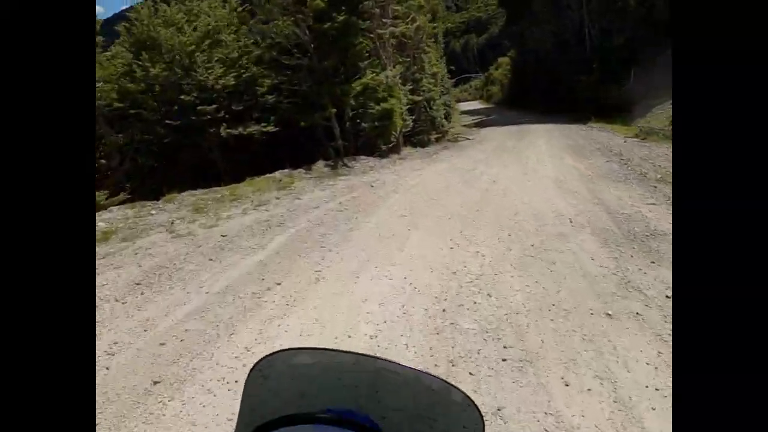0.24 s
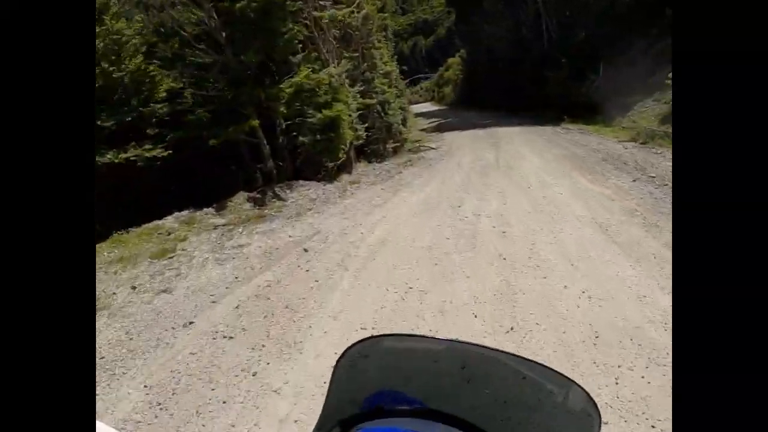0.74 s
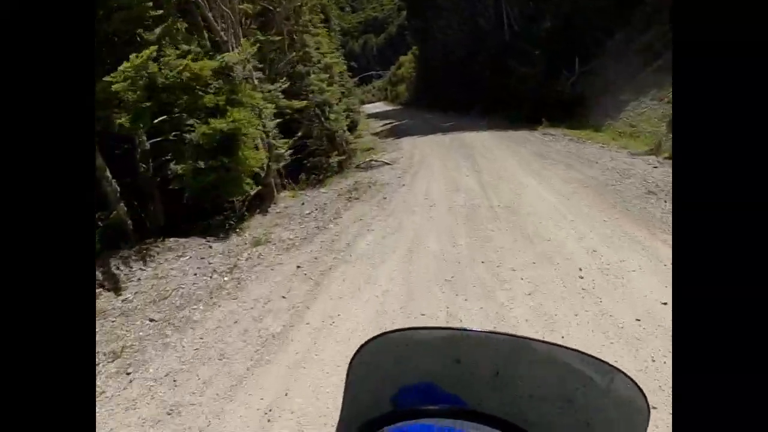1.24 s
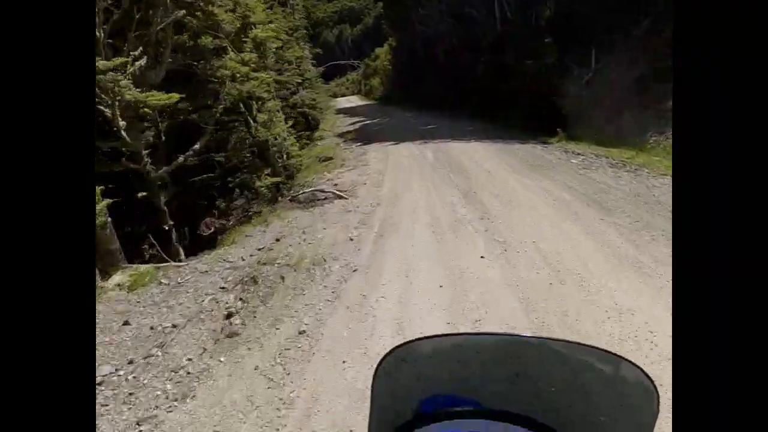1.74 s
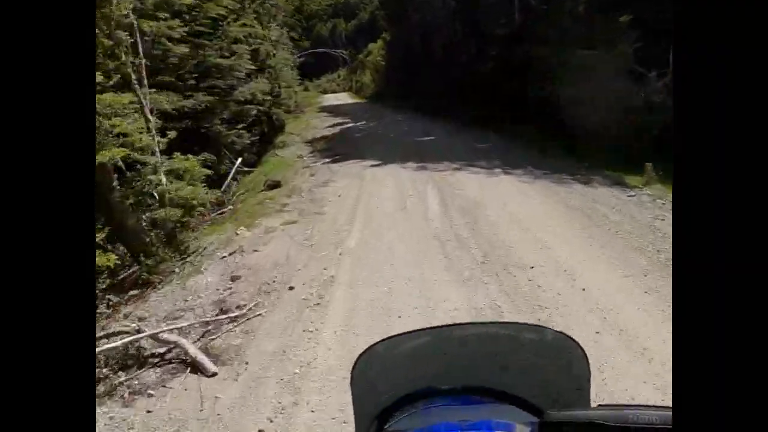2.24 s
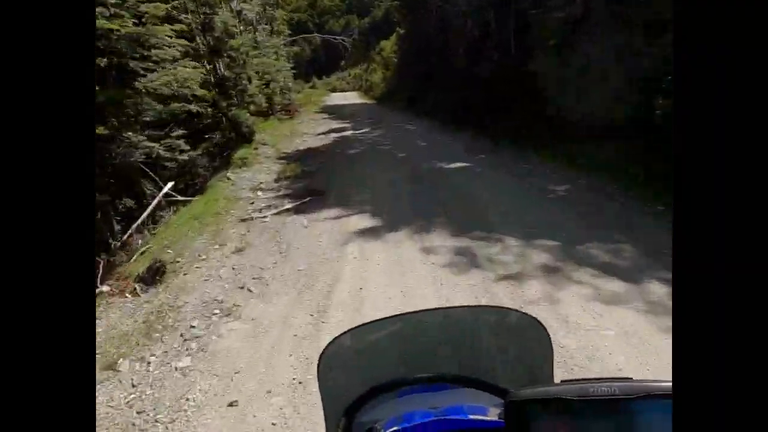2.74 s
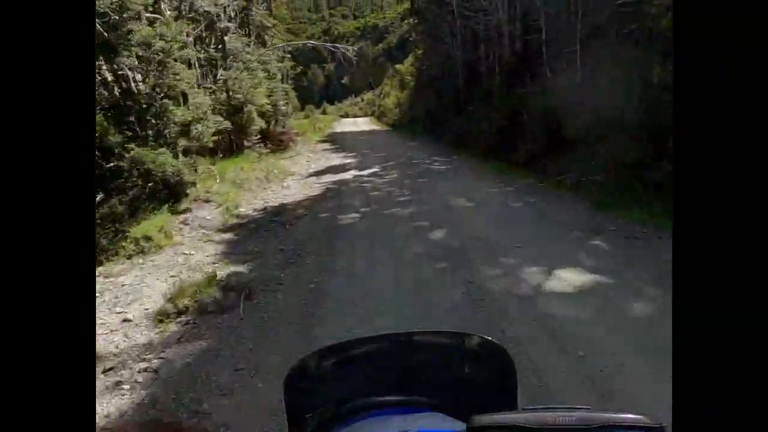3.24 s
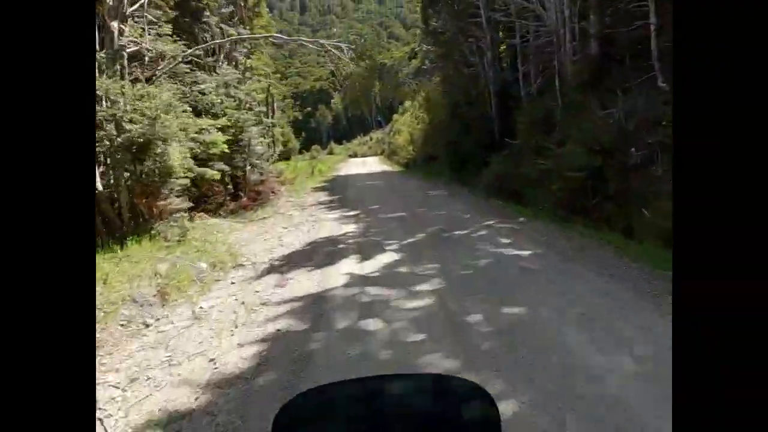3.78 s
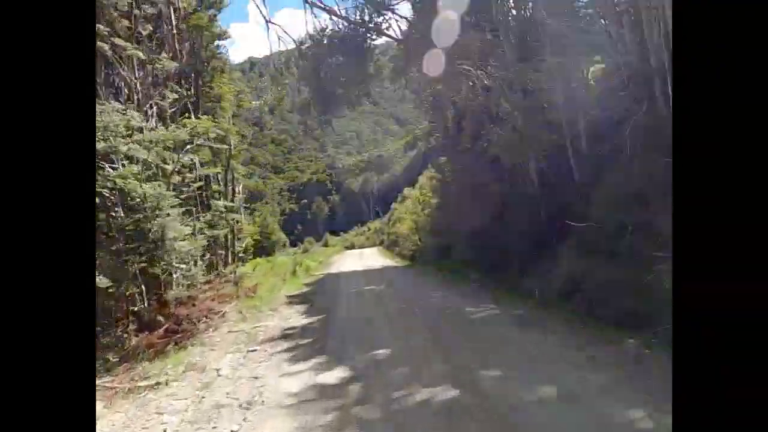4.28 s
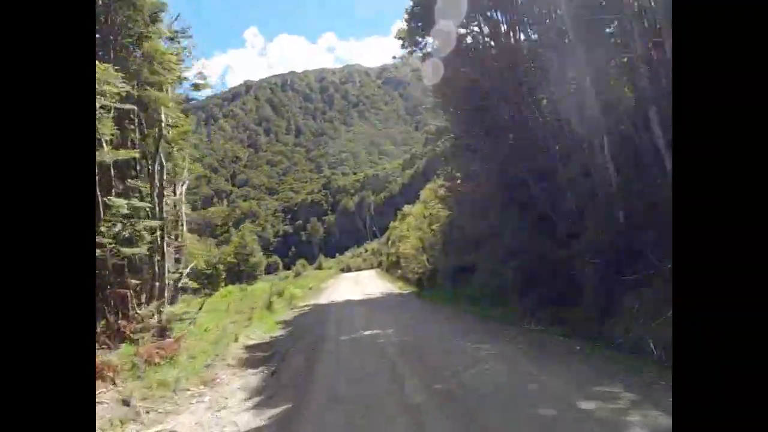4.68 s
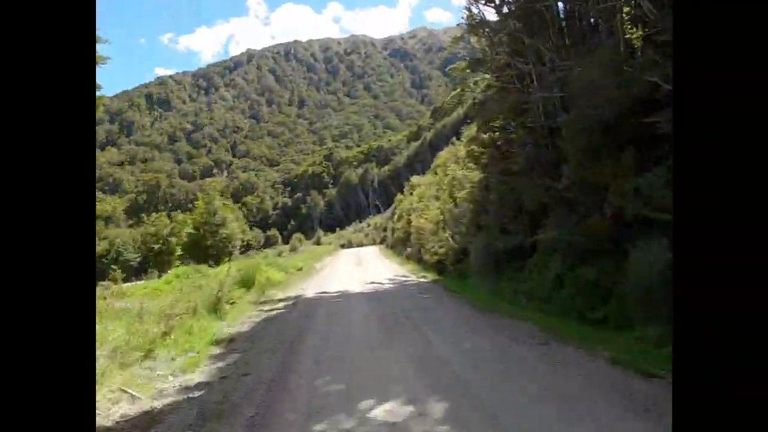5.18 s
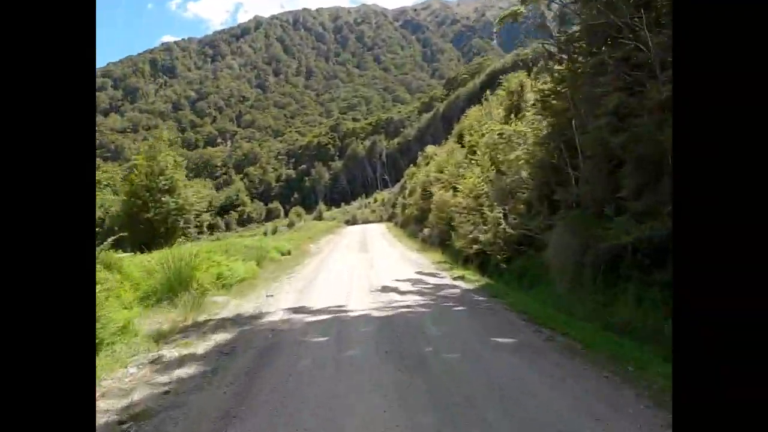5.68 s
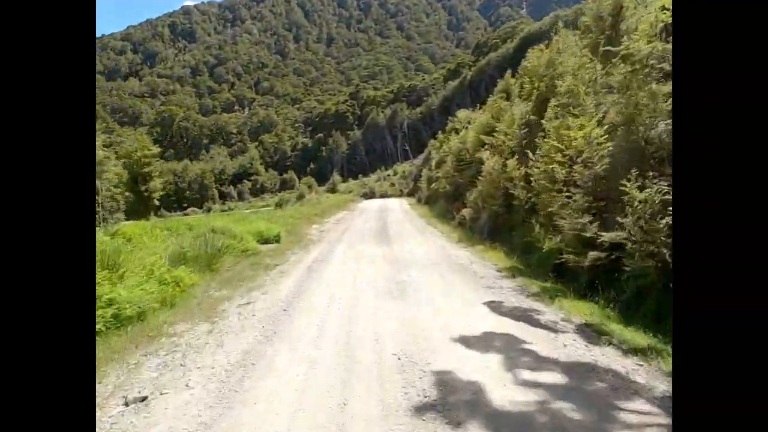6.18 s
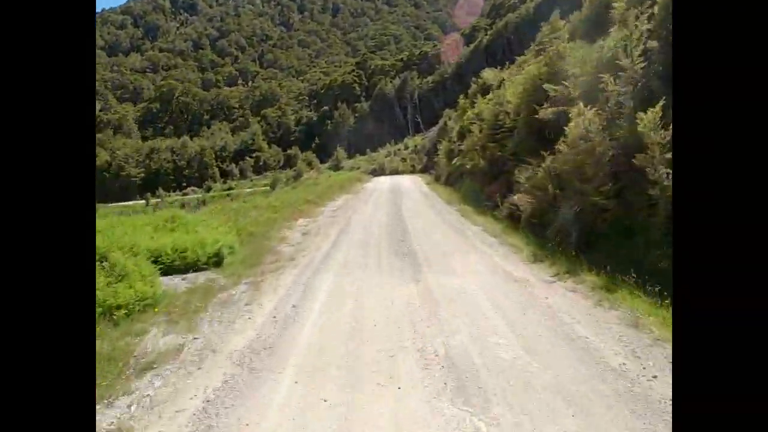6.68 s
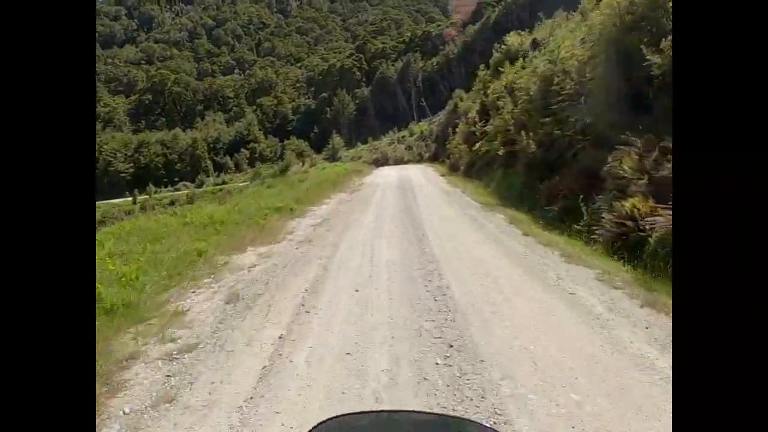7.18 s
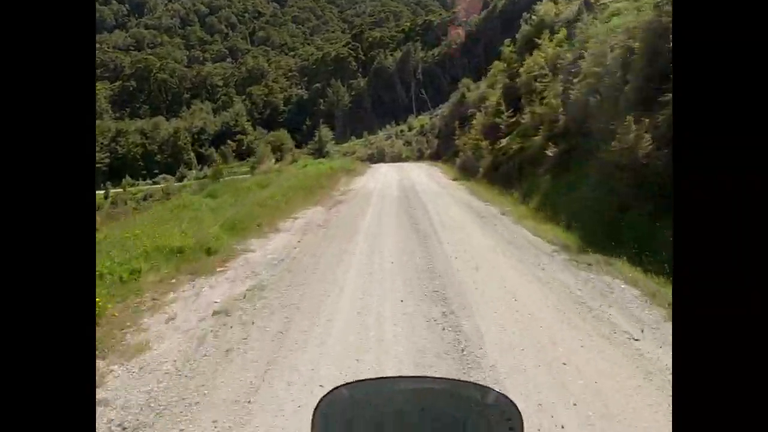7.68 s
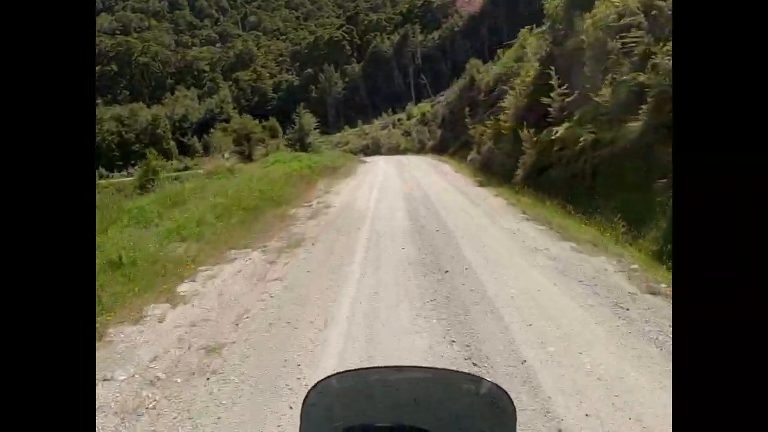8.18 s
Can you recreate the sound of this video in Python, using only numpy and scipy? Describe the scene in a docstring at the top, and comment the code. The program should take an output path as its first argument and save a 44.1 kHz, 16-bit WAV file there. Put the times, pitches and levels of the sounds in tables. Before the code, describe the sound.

A single-cylinder motorcycle revs up, shifts and cruises along a gravel forest road, with buffeting wind, tyre roar and irregular hard knocks close to the microphone.

```python
"""A single-cylinder motorcycle engine, heard from the rider's helmet on a gravel road: each stroke gates a burst
of noise through the resonances of the bodywork, with clatter and a steadier rasp. Tyres roar and drone over a
quiet low-mid rumble, wind buffets the two microphone ports and hums, a gear whine wanders, and bumps knock, thud
and snap the mount as damped oscillations. The recorder rolls off the treble, limits and clips the peaks, and
adds faint hiss."""
import sys
import numpy as np
from scipy import signal
from scipy.fft import rfft, irfft, next_fast_len
from scipy.io import wavfile
from scipy.ndimage import uniform_filter1d

SR = 44100
rng = np.random.default_rng(int(sys.argv[2]) if len(sys.argv) > 2 else 0)


def bounce(signal):
    """Save signal as a 16-bit WAV file at the path given by the first command-line argument."""
    frames = np.transpose(np.atleast_2d(signal))
    limited = np.clip(frames, -1, 1)
    pcm = np.round(limited * 32767).astype(np.int16)
    wavfile.write(sys.argv[1], SR, pcm)


N = 371322
BLOW_TIME = np.arange(4000) / SR   # time axis of one blow on the mount, s


def from_db(db):
    """Amplitude ratio of a level: twenty decibels are a factor of ten."""
    return 10 ** (np.asarray(db) / 20)


def rms_one(x):
    """Scale to unit root mean square, the effective amplitude."""
    return x / np.sqrt(np.mean(x ** 2) + 1e-20)


def in_time(rows):
    """Piecewise linear courses of a table's columns, evaluated at every sample."""
    s, *columns = np.transpose(rows)
    return [np.interp(np.arange(N) / SR, s, column) for column in columns]


def at_hz(points, hz):
    """Interpolate along logarithmic frequency, the scale of pitch."""
    points = np.array(points)
    return np.interp(np.log(hz + 1), np.log(points[:, 0] + 1), points[:, 1])


def noise():
    """Three independent white noises, of equal expected power at all frequencies."""
    return rng.standard_normal((3, N))


def drift(rate_hz):
    """Slow random fluctuation of unit spread: white noise through two equal one-pole low-passes."""
    step = 40   # samples between the computed points
    pole = np.exp(-2 * np.pi * rate_hz * step / SR)
    white = rng.standard_normal(N // step + 2002)
    slow = signal.lfilter([1], [1, -2 * pole, pole * pole], white)[2000:]   # settled part only
    return np.interp(np.arange(N) / step, np.arange(len(slow)), rms_one(slow))


def spectrum(points):
    """Continuous colouring: a frequency response drawn through levels."""
    return lambda hz: from_db(at_hz(points, hz))


def modes(table):
    """Modal resonance: the powers of Lorentzian peaks add, each squared for steep skirts."""
    def response(hz):
        power = 0
        for centre_hz, width_hz, db in table:
            detuning = 2 * (hz - centre_hz) / width_hz
            power = power + from_db(2 * db) / (1 + detuning ** 2) ** 2
        return np.sqrt(power)
    return response


def at_ports(drive, colour, least_share=0):
    """Partial coherence: one drive reaches both ports with a phase difference, two others reach one port each."""
    # phase by which the left port leads (f/Hz, phase/rad)
    port_phase = [(80, -.1), (260, -1.1), (430, -.2), (780, .6), (1100, -1), (1600, -.5), (2150, -1.7),
                  (2700, -2.9), (3200, -1), (4220, -.9), (4500, -.9), (4750, 1.3), (5400, 2.3), (6100, -.5),
                  (7000, -2.5)]
    # left port's level above the right (f/Hz, level/dB)
    port_balance = [(40, 4), (90, -6.5), (170, -6.5), (300, -1), (700, -4.5), (1000, 1), (1460, 4.5),
                    (1700, -4), (2000, 2), (2500, -6.5), (3050, 0.5), (3360, 1.5), (3700, 11.5),
                    (4050, -1.5), (4400, -8.5), (4600, 2.5), (5100, -14), (6100, -11.5), (6600, -7),
                    (7500, 1)]
    # share of the power heard by both ports (f/Hz, share 0-1)
    shared = [(30, 0.82), (90, 0.41), (200, 0.86), (430, 0.46), (600, 0.79), (900, 0.15), (1100, 0.95),
              (1300, 0.97), (1800, 0.44), (2800, 0.11), (3500, 0.21), (4200, 0.88), (4550, 0.16), (5000, 1),
              (5600, 0.17), (7000, 0.52)]
    size = next_fast_len(N)
    hz = np.fft.rfftfreq(size, 1 / SR)
    both, left_only, right_only = rfft(drive, size) * colour(hz)
    share = np.clip(at_hz(shared, hz), least_share, 1)
    common, private = np.sqrt(share), np.sqrt(1 - share)
    turn = np.exp(.5j * at_hz(port_phase, hz))   # half the phase difference to each port
    tilt = from_db(at_hz(port_balance, hz) / 2)
    left = tilt * (common * both * turn + private * left_only)
    right = (common * both / turn + private * right_only) / tilt
    out = irfft([left, right], size)[:, :N]
    return out / np.sqrt(np.mean(out.mean(axis=0) ** 2))   # unit RMS of the ports' mean


def wavering_tone(hz, width_hz, swell, count):
    """Narrow-band oscillation: a carrier times a complex drift; swell 1 is narrow noise, 0 nearly keeps its height."""
    carrier = np.exp(2j * np.pi * np.cumsum(hz) / SR)
    wander = np.array([drift(width_hz) + 1j * drift(width_hz) for k in range(count)])
    levelling = (np.abs(wander) + 0.074) ** (1 - swell)
    return (carrier * wander / levelling).real


def road():
    """Broadband tyre roar on gravel, a drone in hollow resonances, and a quiet low-mid rumble of filtered noise."""
    # road levels (t/s, roar level/dB, drone level/dB)
    road_levels = [(0, -36, -41.5), (.6, -40.5, -36), (1.2, -39, -34), (1.75, -32.5, -32.5),
                   (2.45, -32.5, -36), (2.75, -27, -40), (3.12, -26, -35), (3.75, -29, -28.5),
                   (4.17, -29, -25), (4.55, -29.5, -25), (5.0, -29, -24.5), (5.35, -28.5, -23),
                   (5.7, -28, -23), (5.95, -30, -22.5), (6.54, -31, -30), (7.2, -31, -28.5),
                   (7.65, -30.5, -29.5), (8.21, -27.5, -33.5), (8.42, -26.5, -23)]
    # roar colour (f/Hz, level/dB per Hz)
    roar_colour = [(200, -43.5), (280, -6), (355, 1.5), (430, -7), (660, -7), (800, -7.5), (910, -1.5),
                   (1000, -2.5), (1400, -7), (1700, -23), (2300, -26), (3200, -44)]
    # hollow resonances (f/Hz, width/Hz, level/dB)
    drone_modes = [(161.4, 29.6, -0.5), (353.3, 22, -13), (542, 37, -17.5), (688.5, 84, -14.5)]
    # quiet low-mid rumble (t/s, level/dB)
    rumble_level = [(0, -47), (.5, -45.5), (1.1, -45.5), (1.9, -46), (2.6, -52.5), (8.42, -48)]
    # rumble colour, strongest about 250-340 Hz (f/Hz, level/dB per Hz)
    rumble_colour = [(180, -24), (250, 2), (340, 0.5), (450, -8), (560, -26.5)]
    roar_db, drone_db = in_time(road_levels)
    rumble_db, = in_time(rumble_level)
    roar = at_ports(from_db(2.0 * drift(38)) * noise(), spectrum(roar_colour))
    drone = at_ports(from_db(0.8 * drift(6.2)) * noise(), modes(drone_modes))
    rumble = at_ports(from_db(2.7 * drift(25)) * noise(), spectrum(rumble_colour))
    return from_db(rumble_db) * rumble + from_db(roar_db) * roar + from_db(drone_db) * drone


def hum():
    """Aeolian tones: two slightly wavering hums, strongest while the head is turned into the wind."""
    # hum in the airstream (t/s, low f/Hz, low level/dB, high f/Hz, high level/dB)
    hum_course = [(0, 59.7, -52.5, 166.3, -53), (4.05, 60.34, -45, 168.8, -41), (4.3, 63.8, -20, 170, -34),
                  (4.5, 64.94, -18.5, 176.6, -25), (4.7, 65.96, -14, 167.3, -24.5),
                  (4.82, 60.4, -19, 167, -28.5), (4.95, 64.7, -17, 174.6, -16.5),
                  (5.15, 64.5, -17.5, 164.9, -21.5), (5.3, 62.1, -38, 157, -22),
                  (5.48, 68.6, -11, 158.5, -29.5), (5.7, 66.9, -21, 163.7, -23),
                  (5.95, 59.8, -21.5, 170, -49), (6.2, 60.1, -27, 162.6, -37.5),
                  (8.42, 59.1, -48.5, 162, -46.5)]
    low_hz, low_db, high_hz, high_db = in_time(hum_course)
    low, = wavering_tone(low_hz, width_hz=7.0, swell=0.25, count=1)
    high, = wavering_tone(high_hz, width_hz=7.0, swell=0.5, count=1)
    low_pair = rms_one(low) * from_db([[-1.5], [1.5]])   # left, right
    high_pair = rms_one(high) * from_db([[-4], [3]])
    return from_db(low_db) * low_pair + from_db(high_db) * high_pair


def air():
    """Vortex shedding and turbulence: eddies at a rate set by the head's angle, lumpy rush above; both gust."""
    # airstream, levels before the gusts (t/s, eddy f/Hz, buffeting level/dB, rush level/dB)
    air_course = [(0, 44.2, -20, -32.5), (.5, 44.3, -15.5, -30.5), (1.15, 46.05, -21.5, -33.5),
                  (1.9, 44.65, -15.5, -29), (2.15, 43.93, -20, -33.5), (2.4, 43.04, -12.5, -26),
                  (2.75, 41.7, -15.5, -26), (3.05, 41.75, -11.5, -22.5), (3.75, 42, -12.5, -28.5),
                  (3.98, 41.5, -8, -30), (4.12, 43.95, -23, -26), (4.3, 42.65, -17.5, -23),
                  (4.8, 44.84, -20.5, -20.5), (5.25, 46.1, -15.5, -23), (5.65, 41.15, -18, -23),
                  (6.0, 46.27, -18, -21.5), (6.6, 47.95, -17.5, -29.5), (7.15, 39.5, -20.5, -29.5),
                  (7.42, 35.22, -15.5, -25), (7.95, 33.67, -16.5, -23), (8.3, 35.94, -14.5, -24),
                  (8.42, 35.9, -16, -25.5)]
    # rush colour (f/Hz, level/dB per Hz)
    rush_colour = [(60, -16.5), (90, 12), (125, -1), (160, 0.5), (200, 1), (260, -0.5), (320, -49)]
    eddy_hz, buffet_db, rush_db = in_time(air_course)
    eddies = wavering_tone(eddy_hz, width_hz=17.5, swell=0.39, count=3)
    buffet = at_ports(eddies, spectrum([(12, -25.0), (28, -2.0), (200, -11.0)]))   # (f/Hz, level/dB)
    rush = at_ports(from_db(1.7 * drift(30)) * noise(), spectrum(rush_colour))
    buffet_gusts_db, rush_gusts_db = 2.4 * drift(9.5), 2.4 * drift(7.0)
    return from_db(buffet_db + buffet_gusts_db) * buffet + from_db(rush_db + rush_gusts_db) * rush


def whine():
    """Gear whine: an unsteady narrow-band transmission tone, much stronger at the left port, though it reaches
    the right port 6 samples earlier."""
    # whine, level before the port gains (t/s, f/Hz, level/dB)
    whine_course = [(0, 860, -47.5), (2.3, 870, -46), (2.6, 867, -33), (3.0, 905, -52), (3.3, 922, -37),
                    (3.5, 918, -34.5), (3.7, 930, -41), (3.82, 955, -31.5), (4.05, 991, -30),
                    (4.15, 1003, -44), (4.3, 977, -48.5), (5.8, 905, -51.5), (6.35, 911, -34.5),
                    (6.55, 918, -34), (6.65, 925, -43), (6.8, 932, -36), (7.05, 923.6, -37),
                    (7.3, 907, -32), (7.5, 916, -40), (7.65, 882, -31), (7.78, 846, -30.5),
                    (7.95, 853, -32), (8.03, 872, -26), (8.2, 883, -31.5), (8.42, 885, -30.5)]
    hz, db = in_time(whine_course)
    tone = rms_one(wavering_tone(hz, width_hz=6.0, swell=0.2, count=1)[0])
    return from_db(db) * np.array([1.11 * tone, 0.15 * np.roll(tone, -6)])   # right shifted by 6 samples


def swing(hz):
    """Damped oscillation: a sine swing and rebound, spent after about one cycle."""
    return np.sin(2 * np.pi * hz * BLOW_TIME) * np.exp(-(BLOW_TIME * hz) ** 3)


def add(out, s, shape, pan_db):
    """Interaural-style level and time difference: pan_db is left over right, and the left port hears it later."""
    for side, lag_s, sign in ((0, .0011, 1), (1, 0, -1)):
        at = int((s + lag_s) * SR)
        out[side, at:at + len(shape)] += from_db(sign * pan_db / 2) * shape


def knocks(out):
    """Impulse response of the mount: a wobble, a quick swing and rebound, after-ring and rattling fittings."""
    # knocks, level midway between the ports (peak t/s, peak level/dB, left-right level/dB)
    knock_rows = [(0.1322, -4.5, -9), (0.353, -3.5, -12), (0.6027, -3.5, -9), (0.7905, -4.5, -10),
                  (0.966, -4.5, -10), (1.3804, -3.5, -9), (1.5055, -3.5, -9), (1.7238, -4.5, -10),
                  (1.84, -4.5, -10), (3.2148, -5.5, -10), (3.6488, -9.5, -4), (3.769, -7.5, -9),
                  (3.8121, -11.5, -9), (3.9179, -6.5, -6), (4.0214, -4.5, -11), (4.3952, -7.5, -10),
                  (4.5115, -8.5, -9), (5.2778, -7.5, -11), (5.4911, -6.5, -9), (5.6175, -9.5, -9),
                  (5.738, -3.5, -11), (5.9828, -6.5, -7), (6.1101, -1.5, -8), (6.2262, -3.5, -11),
                  (6.3399, -6.5, -12), (6.4605, -6.5, -11), (6.6085, -6.5, -8), (6.8388, -3.5, -7),
                  (7.0221, -10.5, -8), (8.2576, -9.5, -5)]
    t, knock_hz = BLOW_TIME, 155
    windup_lead_s, windup_hz, windup_db = .0051, 290, -9   # dB under the knock
    rattle_db, rattle_decay_s, rattle_band_hz = -22.5, 0.015, (225, 514)
    after_ring_db, after_ring_decay_s = -27.5, 0.023
    one_cycle = t < 1 / windup_hz
    windup = np.sin(2 * np.pi * windup_hz * t) * (t * windup_hz / .75) * one_cycle   # grows as it goes
    after_ring = from_db(after_ring_db) * np.sin(2 * np.pi * knock_hz * t) * np.exp(-t / after_ring_decay_s)
    edge = .3 * swing(2.2 * knock_hz)   # the contact sharpens the front
    blow = swing(knock_hz) + edge + after_ring
    band = signal.butter(2, rattle_band_hz, "band", fs=SR, output="sos")
    grains = signal.sosfilt(band, rng.standard_normal((len(knock_rows), len(t))))
    rattles = rms_one(grains) * np.exp(-t / rattle_decay_s)
    for (s, db, pan_db), rattle in zip(knock_rows, rattles):
        add(out, s, from_db(db + rattle_db) * rattle, pan_db)
        add(out, s - windup_lead_s, from_db(db + windup_db) * windup, pan_db)
        add(out, s - .2 / knock_hz, from_db(db) * blow, pan_db)   # begins a fifth of a cycle before its peak


def thuds(out):
    """Low-frequency transient: the mount is pulled inward, then lurches slowly under a Gaussian envelope."""
    # heavy thuds, level midway between the ports (peak t/s, peak level/dB)
    thud_rows = [(0.337, -5.7), (0.442, -6.5), (0.748, -7.0), (0.922, -7.7), (1.669, -6.9), (1.773, -7.2),
                 (1.933, -6.2), (2.72, -6.4), (5.701, -4.9), (6.307, -8.1), (6.409, -7.8), (6.527, -7.9),
                 (6.676, -6.3), (6.769, -6.2), (7.404, -7.4), (7.652, -9.0), (8.155, -5.9), (8.323, -7.9)]
    lurch_hz, lurch_width_s, lurch_pan_db = 50, .0125, -3
    pull_lead_s, pull_hz, pull_db, pull_pan_db = .0104, 105, -6.5, -11   # dB under the thud
    middle = BLOW_TIME[-1] / 2
    from_peak = BLOW_TIME - middle
    lurch = np.cos(2 * np.pi * lurch_hz * from_peak) * np.exp(-(from_peak / lurch_width_s) ** 2 / 2)
    for s, db in thud_rows:
        add(out, s - middle, from_db(db) * lurch, lurch_pan_db)
        add(out, s - pull_lead_s, -from_db(db + pull_db) * swing(pull_hz), pull_pan_db)


def snaps(out):
    """Sharp contact: a damped swing of the mount with a crack, the impulse response of a band-pass."""
    # snaps, levels midway between the ports (start t/s, swing level/dB, left-right level/dB,
    # swing f/Hz, crack peak level/dB, top of the crack f/Hz, first swing 1 outward or -1 inward)
    snap_rows = [(.1275, -20, -9, 340, -23, 800, 1), (.3487, -11, -9, 360, -22, 900, 1),
                 (.4304, -4, -12, 270, -19, 600, -1), (.7855, -14, -10, 340, -21, 800, 1),
                 (6.8604, -1, -7, 170, -12, 2250, -1), (6.8572, -24, -7, 400, -13, 1200, -1),
                 (6.8660, -8, -8, 370, -18, 900, -1), (6.8680, -8, -5, 85, -30, 700, 1),
                 (.3255, -22, -9, 300, -22, 700, -1), (.7375, -24, -9, 300, -27, 600, -1)]
    click = np.zeros(len(BLOW_TIME))
    click[30] = 1.0   # sample 30: just after contact
    for s, db, pan_db, hz, crack_db, top_hz, first in snap_rows:
        band = signal.butter(5, [330, top_hz], "band", fs=SR, output="sos")
        crack = signal.sosfilt(band, click)
        shape = from_db(crack_db) * crack / crack.max() + first * from_db(db) * swing(hz)
        add(out, s, shape, pan_db)


def mount_blows():
    """Superposition of all the blows on the mount, with room for the last to die away."""
    out = np.zeros((2, N + SR))
    knocks(out)
    thuds(out)
    snaps(out)
    return out[:, :N]


def throb(depth, second_db, length, rise, uneven_db, lead=0, head=0):
    """Amplitude modulation by the strokes: each burst swells and dies; no two cycles are equally strong."""
    # four-stroke cycle rate: it pulls, shifts up near 2.2 s, then cruises (t/s, f/cycles per s)
    speed = [(0, 17.27), (.75, 23.0), (1.1, 25.43), (1.3, 27.27), (1.45, 27.92), (1.6, 28.1), (1.75, 30.2),
             (1.9, 31.2), (2.1, 30.48), (2.35, 27.77), (2.6, 25.35), (3.0, 25.95), (3.5, 27.63),
             (3.9, 28.88), (4.15, 28.74), (4.3, 28.03), (4.5, 28.52), (4.75, 29.0), (4.95, 29.17),
             (5.2, 28.92), (5.5, 28.47), (5.85, 28.38), (6.15, 28.68), (6.35, 28.44), (6.6, 28.27),
             (6.9, 28.72), (7.2, 28.8), (7.5, 28.68), (7.8, 28.16), (8.1, 28.12), (8.42, 28.66)]
    # firing, then second stroke; decay before the length factor (crank phase/cycles, decay/cycles)
    strokes = [(0.68, 0.4), (0.17, 0.3)]
    crank_start = .66   # cycles
    cycles = crank_start + lead + np.cumsum(in_time(speed)[0]) / SR
    bursts = 0
    for (phase, decay), db in zip(strokes, (0, second_db)):
        since = cycles - phase + 1
        age = since % 1   # cycles since this stroke
        strength = from_db(db + uneven_db * rng.standard_normal(300)[since.astype(int)])
        envelope = np.exp(-(age / (decay * length)) ** 3) * (1 - np.exp(-age / rise))
        bursts = bursts + strength * envelope * (1 + head * np.exp(-age / 0.24))   # head: stronger start
    depth = np.clip(depth, 0, 1)
    return np.sqrt(1 - depth + depth * rms_one(bursts) ** 2)


def evened(x, share):
    """Dense rattling has a low crest factor: dividing by the running power partly levels its swells."""
    power = np.mean(x ** 2, axis=0)
    for _ in range(2):
        power = uniform_filter1d(power, size=301)
    return x * rms_one(1 / (power + 0.12) ** (share / 2))


def ringing(level_db, upper_db, depth, second_db, length, rise):
    """Forced resonance: the strokes gate noise through the bodywork's modes."""
    # lower modes (f/Hz, width/Hz, level/dB)
    lower_modes = [(1090, 28, -1), (1181.4, 32, 1), (1208, 72, 2)]
    # upper modes (f/Hz, width/Hz, level/dB)
    upper_modes = [(1269, 36, 5.5), (1300, 45, -12)]
    # panels start ringing early at low speed (t/s, lead/cycles)
    ring_lead = [(0, .09), (.55, .1), (.9, .04), (1.15, .03), (8.42, .03)]
    # harder firings that ring out of the rest (peak t/s, gain level/dB, width/s)
    hard_firings = [(2.135, 10, .014), (2.172, 7, .01), (2.335, 10, .025), (2.395, 5, .008),
                    (2.485, 9, .014), (2.755, 5, .008), (3.475, 4, .008), (3.59, 4, .008), (4.178, 6, .008),
                    (4.915, 4, .008), (5.26, 5, .008), (5.33, 4, .008), (5.47, 4, .008), (5.575, 4, .008),
                    (6.31, 7, .008), (6.66, 4, .008), (7.32, 4, .012), (7.89, 4, .008), (8.24, 4, .008)]
    t = np.arange(N) / SR
    level_db = level_db + 1.53 * drift(8.8)
    for s, db, width_s in hard_firings:
        level_db = level_db + db * np.exp(-((t - s) / width_s) ** 2 / 2)
    lower = at_ports(noise(), modes(lower_modes), 0.95)
    upper = at_ports(noise(), modes(upper_modes), 0.6)
    upper_db = upper_db - 3.5
    body = (lower + from_db(upper_db) * upper) / np.sqrt(1 + from_db(2 * upper_db))   # powers sum to one
    gate = throb(depth, second_db, length, rise, uneven_db=0.84, lead=in_time(ring_lead)[0])
    ring = gate * evened(body, share=.9)
    band = signal.butter(3, [990, 1390], "band", fs=SR, output="sos")   # the panels ring in one band only
    return from_db(level_db) * signal.sosfilt(band, ring)


def clatter(level_db):
    """Repeated impact noise: short, sharply rising bursts of coloured noise at the strokes."""
    # clatter colour (f/Hz, level/dB per Hz)
    clatter_colour = [(1300, -43.5), (1500, -13.5), (2000, -12), (2450, -7), (2900, -10.5), (3600, -8.5),
                      (3950, -8.5), (4170, -1), (4600, -17.5), (4900, -7.5), (5480, -24), (5720, -18),
                      (5920, -19), (6120, -16), (6500, -26.5), (7300, -29), (7800, -30.5)]
    # burst length (t/s, length factor)
    clatter_length = [(0, 1.2), (.6, 1.1), (1.2, 1.74), (2.0, 2), (8.42, 1.6)]
    length, = in_time(clatter_length)
    gate = throb(0.95, -10.0, length, rise=.03, uneven_db=0.2, lead=-0.028, head=0.39)
    return from_db(level_db) * at_ports(gate * noise(), spectrum(clatter_colour))


def rasp(broad_db, resonant_db, rise):
    """Shared excitation: one barely throbbing noise drives both a broad rasp and a resonant rasp."""
    # broad rasp colour (f/Hz, level/dB per Hz)
    rasp_colour = [(1300, -16), (1500, 1.5), (1600, 0), (1750, 5), (2400, -1), (3400, -4), (3690, -5.5),
                   (3950, -4), (4550, -11), (4900, -9.5), (5450, -14.5), (5780, -14.5), (6600, -19.5),
                   (7050, -31.5), (7250, -14), (7800, -41)]
    # resonances of the rasp (f/Hz, width/Hz, level/dB)
    rasp_modes = [(1690, 83, -2.5), (3690, 240, 1.5), (4880, 200, -12.5), (5780, 180, -14),
                  (7100, 240, -16)]
    drive = throb(0.2, -3, 1.9, rise, uneven_db=1.3) * noise()
    broad = at_ports(drive, spectrum(rasp_colour))
    resonant = at_ports(drive, modes(rasp_modes))
    return from_db(broad_db) * broad + from_db(resonant_db) * resonant


def engine():
    """Periodic excitation of structures: the strokes gate ringing and clatter; the rasp barely throbs."""
    # engine, ringing level before its fluctuation, upper modes before a fixed 3.5 dB cut
    # (t/s, ringing level/dB, clatter under load level/dB, cruising rasp level/dB,
    # upper against lower modes level/dB, throb depth of the ringing 0-1)
    engine_levels = [(0, -28, -39, -48, 1, 1), (.55, -17.5, -39, -45.5, -8.5, 1),
                     (.95, -15.5, -36.5, -47, -4.5, 0.83), (1.2, -10.5, -36.5, -50, -10.5, 0.93),
                     (1.9, -15, -39, -41, 1.5, 0.68), (2.02, -23.5, -41, -43.5, 1.5, 0.72),
                     (2.12, -30, -53, -43.5, 4, 0.94), (2.35, -31.5, -59, -41.5, -4.5, 0.6),
                     (2.55, -28, -47, -40, 6, 0.66), (2.8, -18, -42, -38, 15.5, 0.89),
                     (3.2, -20, -42, -36.5, 2.5, 0.87), (3.6, -19, -46.5, -37, 10, 0.97),
                     (4.0, -20, -44, -38, 0, 0.9), (4.4, -21.5, -59, -39, -3, 0.68),
                     (5.0, -18, -55, -37.5, -1.5, 0.63), (5.4, -17.5, -51, -35.5, -5, 0.87),
                     (5.8, -18.5, -48.5, -38, 0, 0.83), (6.2, -24, -48.5, -39.5, -6.5, 0.75),
                     (7.1, -25.5, -48.5, -41, -0.5, .55), (7.5, -23.5, -42.5, -39, -6, 0.66),
                     (8.2, -20, -56, -35, 8, 0.63), (8.42, -18.5, -62, -36.5, -1.5, 0.9)]
    # load, and the resonant rasp, strongest about 4.2-6 s
    # (t/s, second stroke against firing level/dB, burst length factor, resonant rasp level/dB)
    load = [(0, -5.5, 1.5, -64), (.3, -6.5, 1.34, -65), (.6, -7.5, 1.2, -64), (1.0, -3, 0.78, -55),
            (1.9, -1, 0.98, -60), (2.5, -3, 0.87, -62), (3.9, -7.5, 1.24, -51.5), (4.4, -5, 0.9, -45.5),
            (5.3, -5, 0.7, -45), (6.0, -6, 1.23, -51), (6.6, -2, 1.02, -61.5), (7.6, -6.5, 1.05, -66),
            (8.42, -3.5, 0.75, -46.5)]
    ring_db, clatter_db, rasp_db, upper_db, ring_depth = in_time(engine_levels)
    second_db, length, resonant_db = in_time(load)
    rise = .13   # swell of a burst, cycles
    ring = ringing(ring_db, upper_db, ring_depth, second_db, length, rise)
    return ring + clatter(clatter_db) + rasp(rasp_db, resonant_db, rise)


def scene():
    """Superposition of the sources; the wind noise is turned down under each hard blow, so the blow stands clear."""
    blows = mount_blows()
    jolt = uniform_filter1d(np.abs(blows[1]), size=401)   # smoothed at the right port
    wind_gain = 1 / (1 + (jolt / .2) ** 2)
    return road() + hum() + wind_gain * air() + whine() + blows + engine()


def record(dry):
    """Band limiting and peak limiting: treble rolled off, peaks ducked, the rest clipped; faint hiss, top cut."""
    roll_off_hz, cutoff_hz, hiss_db = 8000, 14500, -74
    x = signal.sosfilt(signal.cheby2(14, 30, roll_off_hz, fs=SR, output="sos"), dry)
    over_db = np.maximum(20 * np.log10(np.abs(x) + 1e-9), 0)
    fall = 300 * np.arange(N) / SR   # release of 300 dB a second
    held = np.maximum.accumulate(over_db + fall, axis=1) - fall
    # looks a little ahead; each side sheds most of its overshoot
    ducking_db = -.96 * uniform_filter1d(held, size=61, origin=-24, mode="nearest")
    x = np.clip(x * from_db(ducking_db), -1, 1)
    hiss_band = signal.butter(2, [8000, 12000], "band", fs=SR, output="sos")
    hiss = signal.sosfilt(hiss_band, rng.standard_normal((2, N)))
    x = x + from_db(hiss_db) * rms_one(hiss)
    return signal.sosfilt(signal.cheby2(12, 60, cutoff_hz, fs=SR, output="sos"), x)


dry = scene()
out = record(dry)
bounce(out)
```